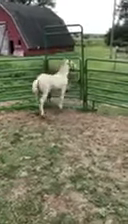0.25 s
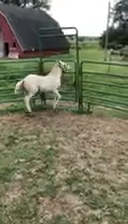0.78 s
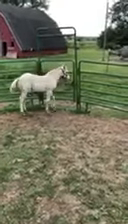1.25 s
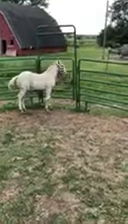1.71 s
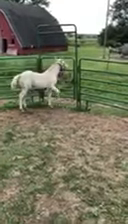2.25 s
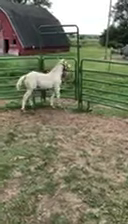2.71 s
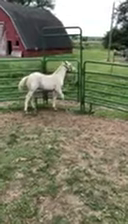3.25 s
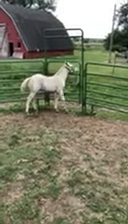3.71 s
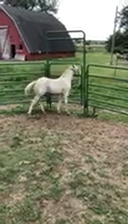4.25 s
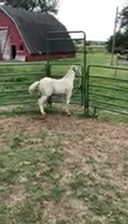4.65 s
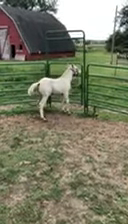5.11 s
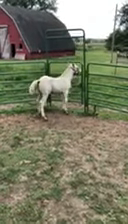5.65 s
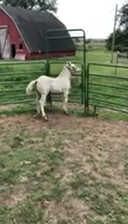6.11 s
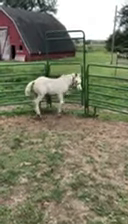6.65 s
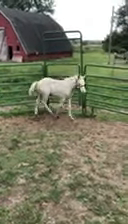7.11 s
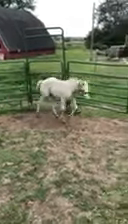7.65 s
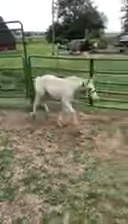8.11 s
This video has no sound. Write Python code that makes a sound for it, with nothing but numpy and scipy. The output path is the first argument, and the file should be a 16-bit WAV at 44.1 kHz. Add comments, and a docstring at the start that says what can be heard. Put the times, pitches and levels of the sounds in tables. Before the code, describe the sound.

A sharp, ringing clank opens the scene as a young horse bumps steel pipe corral panels. Crickets chirr quietly throughout, over a faint rumble of air. A soft hoof thud and two faint taps follow, then tiny halter jingles around 1 second. A loud double clank rings at 2.2 seconds, with more small jingles after it. Another clank comes at 4 seconds, then a low thump. From 4.5 to 5.1 seconds the panel rocks in five quick, fading clanks, scraping and rattling. A double clank rings at 5.9 seconds, while light knocks and faint dragging continue until about 7.4. The high cricket trill swells slightly in the second half. One thin chip, like a distant bird, sounds at 7.3 seconds. From 7.6 seconds to the end, around 8.3, the horse walks off with soft, gritty hoof thuds on dirt and small halter jingles.

```python
"""Steel pipes clank and ring and loose joints rattle as a young horse fidgets against corral panels.
Each blow excites decaying pipe modes; knocks and drags sound through the frame's damped resonances.
The horse walks off with soft hoof thuds on dirt and small jingles of its halter.
Crickets chirr with their wings all round the field, over a faint air rumble; one thin chip sounds late."""
import sys
import numpy as np
from scipy.fft import rfft, irfft, next_fast_len
from scipy.io import wavfile
from scipy.ndimage import map_coordinates

SR = 44100
rng = np.random.default_rng(int(sys.argv[2]) if len(sys.argv) > 2 else 0)


def dump(signal):
    """Clip the signal to [-1, 1] and save it as 16-bit WAV at the path in sys.argv[1]."""
    limited = np.clip(np.atleast_2d(signal).T, -1, 1)
    pcm = np.round(limited * 32767).astype(np.int16)
    wavfile.write(sys.argv[1], SR, pcm)


N = 369099

# Noise spectra. Each row: frequency in Hz, relative density in dB.
AIR_SPECTRUM = [(20, -10.5), (45, 1), (80, 4), (115, 3.5), (180, -3.5), (400, -7), (1000, -11.5),
                (2000, -15.5), (4000, -19.5), (5600, -54.5), (10000, -27.5)]
CHORUS_SPECTRUM = [(3000, -54), (3900, -13), (4400, -2), (4800, 2), (5100, 2), (5350, -22), (5600, -58.5)]  # far field crickets
TRILL_SPECTRUM = [(5700, -79), (6500, -13.5), (7300, -0.5), (7650, 7), (7950, 11), (8200, 8.5), (8850, 7),
                  (9150, -2.5), (10000, -37), (11000, -77)]  # ground crickets
BUCKLE_SPECTRUM = [(3000, -45), (6000, -14.5), (7200, 5), (8000, 23), (8900, 20.5), (9600, -29),
                   (12000, -58)]
BODY_SPECTRUM = [(100, -13), (300, -7), (600, 0), (900, 0.5), (1200, 2.5), (1600, -8), (2000, -12.5),
                 (3000, -18.5), (6000, -55)]  # frame around a joint
EDGE_SPECTRUM = [(1000, -5.5), (2200, 14.5), (3000, 10.5), (3700, 7), (5000, -2), (6500, -24),
                 (10000, -18.5)]  # steel edge of a joint
CLATTER_SPECTRUM = [(150, -33), (300, -31), (480, -1.5), (900, -5), (1400, 1.5), (1800, -0.5), (2800, 4),
                    (4300, -3), (5300, 2), (6600, -12.5), (8000, -3.5), (10000, -17.5), (13000, -53)]  # crack and weak modes of a blow

# Halter fittings touching. Each row: start in seconds, level in dB, T60 in seconds.
JINGLES = [(.827, -50, 0.24), (1.246, -44, .06), (2.426, -45, 0.23), (2.916, -49.5, 0.66),
           (7.39, -57, 0.28), (7.695, -45.5, 0.17), (7.996, -47.5, 0.082), (8.136, -37, 0.058)]
# Low thuds: hooves on dirt, and one low thump of the panel frame at 4.2 s.
# Each row: start in seconds, thud level in dB, grit level in dB.
LOW_THUDS = [(.203, -48.5, -53), (4.213, -46.5, -77), (4.355, -51.5, -60), (4.667, -45, -83),
             (7.585, -72, -57.5), (7.729, -43, -55), (7.835, -51.5, -59.5), (7.973, -36.5, -48.5),
             (8.304, -40.5, -50.5)]
# The horse leans and the panel drags. Each row: start in seconds, length in seconds, level in dB.
DRAGS = [(4.534, 0.53, -50.5), (5.53, 0.31, -63.5), (6.12, 0.54, -62.5), (7.093, 0.4, -73)]
# Light knocks on a loose joint. Each row: start in seconds, relative level in dB.
NUDGES = [(4.622, -41), (4.809, -35), (5.374, -50), (5.527, -44), (5.647, -46.5), (5.704, -42),
          (6.128, -41), (6.278, -41.5), (6.393, -49.5), (6.482, -55), (6.582, -50.5), (6.693, -46.5),
          (7.147, -50.5), (7.337, -47)]
# A shoved panel rocks, hitting its joint at the end of each swing. Each entry: time in seconds.
SWING_TIMES_S = [4.561, 4.705, 4.845, 4.999, 5.136]
# Damped frame resonances. Each row: centre in Hz, width in Hz, gain in dB.
FRAME_MODES = [(606, 26, -12), (783, 20, 2.5), (865, 30, -2.5), (948, 25, 1.5), (1136, 25, -2.5),
               (1246, 20, 1.5), (1355, 37, 2), (1526, 104, -0.5), (1622, 50, -7), (1695, 51, 0.5)]
# Decay of the weak modes. Each row: frequency in Hz, T60 in seconds.
CLATTER_DECAY = [(400, 0.29), (1000, 0.67), (2000, 1), (4000, 0.6), (6500, 0.68), (8500, 0.78)]
# Pipe modes. Each row: frequency in Hz, gain in dB, nominal T60 in seconds before added losses.
PIPE_MODES = [(951, -20, 1.), (1356, -16, .6), (1718, -9, 1.3), (1757, -6.5, 2.5), (1776, -9, 1.5),
              (1842, -8, 1.3), (1866, -6, 2.), (2012, -13, 1.3), (2033, -12, 1.5), (2259, -6.5, 1.45),
              (2391, -12, 1.5), (2546, -12, 1.1), (2600, -12, 1.1), (2746, -11, 1.), (2881, -7, .75),
              (2971, -13, .6), (3229, -12, 1.), (3380, -11, .7), (3588, 0, .55), (4075, -8, .35),
              (4838, -10, .75), (4949, -8, .75), (5005, -10, .65), (5107, -10, .7), (5212, -7, .65),
              (5372, -6, .62), (5551, -4, .55), (5755, -13, .45), (5993, -6, .38), (6269, -11, .42)]
# Blows on the panels. Each row: start in seconds, level in dB, tilt in dB per octave, mid lift in dB,
# place as a fraction of the rail, damping by the horse in 1/s (added to 1/T60; negative rings freer).
PANEL_BLOWS = [(-.02, -32, 3, -1.5, 0.11, 0.28), (.336, -58.5, -7.5, -4, .4, -0.35),
               (.617, -60.5, -8, 0.5, .402, 0), (2.217, -33.5, 2.5, 4, 0.1357, 0.43),
               (2.261, -38, 6, 4.5, .088, -.02), (2.723, -61, -3, 6, 0.128, 0.3),
               (3.82, -56.5, -2, 3, .364, 0.2), (4.031, -37.5, 5, -.5, 0.057, 0.1),
               (4.622, -49, -0.5, 2.5, .23, 2), (5.916, -41.5, 2.5, 4, 0.071, .7),
               (5.937, -40, 7.5, -2.5, 0.127, -0.42)]


def amp(db):
    return 10 ** (np.asarray(db) / 20)


def unit_rms(x):
    return x / np.sqrt(np.mean(x ** 2) + 1e-20)


def along(points, hz):
    """Interpolate (Hz, value) rows on a log axis."""
    knots_hz, values = np.transpose(points)
    return np.interp(np.log(hz + 1), np.log(knots_hz + 1), values)


def wobble(rate_hz):
    """Smooth random curve."""
    knots = rng.standard_normal(int(N * rate_hz / SR) + 4)
    return map_coordinates(knots, [np.arange(N) * rate_hz / SR])


def filtered(x, gain_at_hz):
    size = next_fast_len(len(x) + 8192)
    return irfft(rfft(x, size) * gain_at_hz(np.fft.rfftfreq(size, 1 / SR)), size)[:len(x)]


def noise(spectrum, size):
    return unit_rms(filtered(rng.standard_normal(size), lambda hz: amp(along(spectrum, hz))))


def rise(t, attack_s):
    return 1 - np.exp(-t / attack_s)


def fade(t, t60_s):
    return np.exp(-np.log(1000) * t / t60_s)


def add(track, start_s, sound):
    start = round(start_s * SR)
    sound = sound[max(-start, 0):N - start]
    track[max(start, 0):][:len(sound)] += sound


def air(level_db=-65.5):
    """Moving air rumbles faintly."""
    return amp(level_db + 0.32 * wobble(7.9)) * noise(AIR_SPECTRUM, N)


def cricket(top_hz, rate_hz, stroke_s=0.02085, sag=0.14):
    """Each wing stroke is a tone that sags as the file slows; strokes vary and come in bouts."""
    out, progress = np.zeros(N), np.linspace(0, 1, int(stroke_s * SR))
    for k, (late, force, pitch) in enumerate(rng.standard_normal((int(N / SR * rate_hz) - 1, 3))):
        hz = top_hz * (1 + 0.0361 * np.tanh(pitch)) * (1 - sag * progress ** 1.65)
        tone = np.sin(2 * np.pi * np.cumsum(hz) / SR) * np.sin(np.pi * progress) ** 2
        add(out, (k + .2 * late) / rate_hz, amp(5 * np.tanh(force)) * tone)
    bouts = amp(3.5 * wobble(4))
    return unit_rms(out * bouts)


def crickets(field_db=-63, ground_db=-59, nearest_db=-71.5, surge_db=6, surge_s=(5.3, 8.2), ramp_s=0.28):
    """Three field crickets before a far chorus; ground crickets trill, the nearest swelling a while."""
    t = np.arange(N) / SR
    near = unit_rms(cricket(5150, rate_hz=23) + cricket(4950, rate_hz=26) + cricket(4750, rate_hz=19))
    far = amp(.5 + .8 * wobble(30)) * noise(CHORUS_SPECTRUM, N)
    trill = amp(1.33 * wobble(90) + .75 * wobble(9)) * noise(TRILL_SPECTRUM, N)
    whine_hz = 7960 + 35 * wobble(150)
    whine = unit_rms(np.sin(2 * np.pi * np.cumsum(whine_hz) / SR) * amp(3.8 * wobble(90)))
    surge = np.clip(np.minimum(t - surge_s[0], surge_s[1] - t) / ramp_s, 0, 1)
    return amp(field_db) * (near + far) + amp(ground_db) * trill + amp(nearest_db + surge_db * surge) * whine


def chip(start_s=7.259, hz=6430, level_db=-45):
    """One thin chip, like a small bird far off."""
    out, t = np.zeros(N), np.arange(SR // 4) / SR
    add(out, start_s, amp(level_db) * np.sin(2 * np.pi * hz * t) * rise(t, .006) * fade(t, 0.089))
    return out


def halter(retouch_s=.014, retouch_db=-4):
    """Tiny metal fittings touch twice and shimmer briefly."""
    out, t = np.zeros(N), np.arange(SR // 2) / SR
    retouches = [(start_s + retouch_s, db + retouch_db, t60_s) for start_s, db, t60_s in JINGLES]
    for start_s, db, t60_s in list(JINGLES) + retouches:
        add(out, start_s, amp(db) * noise(BUCKLE_SPECTRUM, len(t)) * rise(t, 0.00027) * fade(t, t60_s))
    return out


def low_thuds(start_hz=250, end_hz=78, settle_s=0.0094, rumble_db=-7, repeat_s=.025, repeat_db=-7):
    """Gritty double thuds of falling pitch: hooves on dirt, heel then toe, and one panel frame thump."""
    out, t = np.zeros(N), np.arange(SR // 3) / SR
    pitch_hz = end_hz + (start_hz - end_hz) * np.exp(-t / settle_s)
    tone = np.sin(2 * np.pi * np.cumsum(pitch_hz) / SR)
    repeats = [(start_s + repeat_s, thud_db + repeat_db, grit_db + repeat_db)
               for start_s, thud_db, grit_db in LOW_THUDS]
    for start_s, thud_db, grit_db in list(LOW_THUDS) + repeats:
        rumble = noise([(30, -10), (80, 20), (220, -3), (500, -12.5), (1500, -52)], len(t))
        grit = noise([(200, 7), (600, 5), (1500, 3.0), (3500, -1.5), (10000, -19)], len(t))
        thud = tone + amp(rumble_db) * rumble
        add(out, start_s, amp(thud_db) * thud * rise(t, 0.0037) * fade(t, 0.1))
        add(out, start_s, amp(grit_db) * grit * rise(t, 0.0011) * fade(t, 0.11))
    return out


def frame_chatter(size, broad_db=-3):
    """Contact noise through the frame's damped resonances."""
    def peaks(hz):
        return sum(amp(db) / (1 + (2 * (hz - centre_hz) / width_hz) ** 2)
                   for centre_hz, width_hz, db in FRAME_MODES)
    resonant = unit_rms(filtered(rng.standard_normal(size), peaks))
    return unit_rms(resonant + amp(broad_db) * noise(BODY_SPECTRUM, size))


def scrape(edge_db=-9, rough_db=3, release_t60_s=1.26):
    """The panel grinds while pushed, then shivers to rest."""
    t, envelope = np.arange(N) / SR, np.zeros(N)
    for start_s, length_s, db in DRAGS:
        release = fade(np.maximum(t - length_s, 0), release_t60_s)
        add(envelope, start_s, amp(db) * rise(t, 0.018) * release)
    grind = frame_chatter(N) + amp(edge_db) * noise(EDGE_SPECTRUM, N)
    return envelope * unit_rms(grind * amp(rough_db * wobble(150)))


def rattles(body_gain_db=-7, tail_db=-15, bounce_s=.027, grain_db=2):
    """Loose joints knock; each knock bounces once, softer and duller."""
    out, t = np.zeros(N), np.arange(SR // 2) / SR
    envelope = rise(t, 0.0018) * (fade(t, 0.13) + amp(tail_db) * fade(t, 1.0))
    knocks = [(start_s, -38.5, -35.5 - 4 * k) for k, start_s in enumerate(SWING_TIMES_S)]
    knocks += [(start_s, db, db - 16) for start_s, db in NUDGES]
    bounces = [(start_s + bounce_s, body_db - 4.5, edge_db - 8) for start_s, body_db, edge_db in knocks]
    for start_s, body_db, edge_db in knocks + bounces:
        body = amp(body_db + body_gain_db) * frame_chatter(len(t))
        edge = amp(edge_db) * noise(EDGE_SPECTRUM, len(t))
        add(out, start_s, (body + edge) * envelope)
    return out * unit_rms(amp(grain_db * wobble(400)))


def clatter(modes_hz, t, scatter_db=2.7):
    """Many weak modes of the welded frame, struck at random strengths, each with its own decay."""
    scatter, phase = rng.standard_normal((2, len(modes_hz), 1))
    gain = amp(along(CLATTER_SPECTRUM, modes_hz))[:, None] * amp(scatter_db * scatter)
    t60_s = along(CLATTER_DECAY, modes_hz)[:, None]
    modes = np.sin(2 * np.pi * (modes_hz[:, None] * t + phase)) * fade(t, t60_s)
    return np.sum(gain * modes, axis=0) / np.sqrt(np.sum(gain ** 2) / 2)


def blow_gain(level_db, tilt_db_per_oct, lift_db, middle_hz=3400, half_width_oct=0.78):
    """A blow's gain against frequency: a tilt plus a bump on the middle modes."""
    def gain(hz):
        octaves = np.log2(np.clip(hz, 900, 8000) / middle_hz)
        bump = np.exp(-(octaves / half_width_oct) ** 2)
        return amp(level_db + tilt_db_per_oct * octaves + lift_db * bump)
    return gain


def pipe_ring(t, gain, place, damping_per_s, loss_factor=1.314, rail_hz=12, split_hz=5, scatter_db=1.75):
    """Rails are nearly alike, so each mode beats with a twin; a mode struck near a node is weak."""
    ring = np.zeros(len(t))
    for hz, db, nominal_t60_s in PIPE_MODES:
        scatter, phase, detune = rng.standard_normal(3)
        t60_s = 1 / max(loss_factor / nominal_t60_s + damping_per_s, .15)
        age_s = t[:int(t60_s * SR)]
        angle = 2 * np.pi * (hz * age_s + phase)
        twin = 0.51 * np.sin(angle + 2 * np.pi * (split_hz * detune * age_s + scatter))
        mode_shape = np.sin(np.pi * place * np.sqrt(hz / rail_hz))  # rail_hz: lowest bending mode
        strength = np.sqrt(.15 + mode_shape ** 2) * gain(hz) * amp(db + scatter_db * scatter)
        ring[:len(age_s)] += strength * (np.sin(angle) + twin) * fade(age_s, t60_s)
    return ring


def clanks(ring_db=1.04, clatter_db=-7, crack_db=1, firm_db=-44.5):
    """Steel on steel at each blow and swing: a crack, a dense clatter, then the long pipe modes."""
    out, t = np.zeros(N), np.arange(3 * SR) / SR
    burst_t = t[:SR // 2]
    weak_hz = rng.uniform(700, 10100, 110)
    swings = [(start_s, -43 - 6.5 * k, 2, 5.5, 0.1405, 3.1) for k, start_s in enumerate(SWING_TIMES_S)]
    for start_s, level_db, tilt_db_per_oct, lift_db, place, damping_per_s in list(PANEL_BLOWS) + swings:
        gain = blow_gain(level_db, tilt_db_per_oct, lift_db)
        # Softer blows build more slowly and crack less.
        hardness_db = 2.5 - 0.52 * max(firm_db - level_db, 0)
        swell = rise(t, .0013 / amp(hardness_db))
        ring = amp(ring_db) * pipe_ring(t, gain, place, damping_per_s) * swell
        crack = amp(crack_db + hardness_db) * noise(CLATTER_SPECTRUM, len(burst_t)) * fade(burst_t, 0.17)
        burst = crack + amp(clatter_db) * clatter(weak_hz, burst_t) * swell[:len(burst_t)]
        add(out, start_s, ring)
        add(out, start_s, filtered(burst, gain))
    return out


def scene():
    return (clanks() + rattles() + scrape() + low_thuds() + halter() + crickets() + chip() + air())[None]


def record(dry):
    """Steep low-pass."""
    cutoff_hz = 10200
    return np.array([filtered(x, lambda hz: 1 / np.sqrt(1 + (hz / cutoff_hz) ** 120)) for x in dry])


dry = scene()
out = record(dry)
dump(out)
```